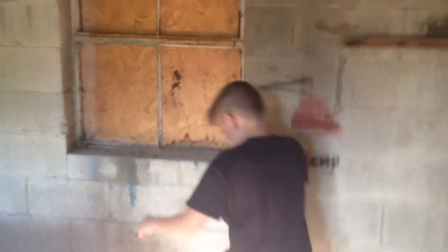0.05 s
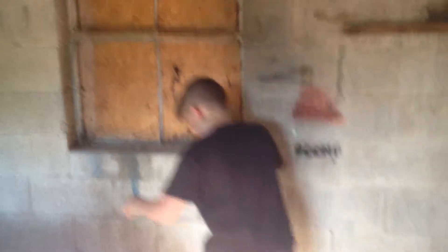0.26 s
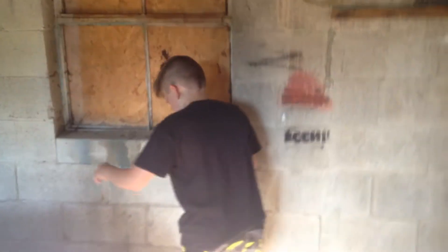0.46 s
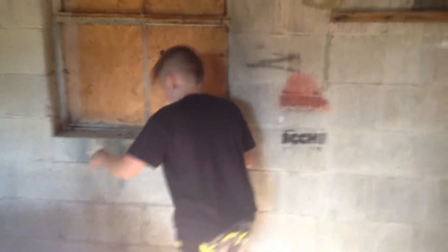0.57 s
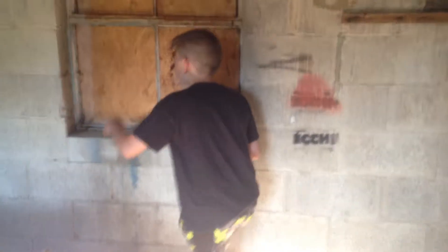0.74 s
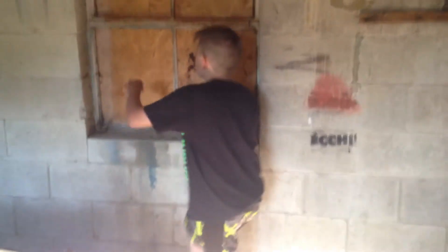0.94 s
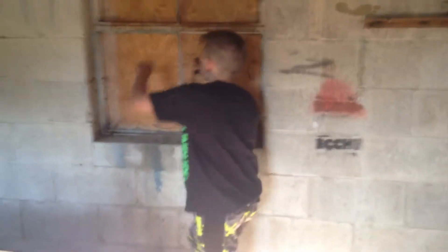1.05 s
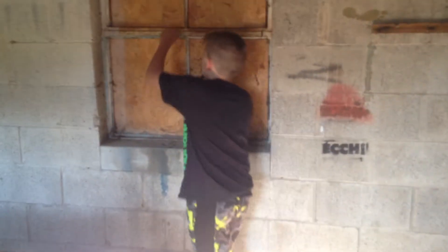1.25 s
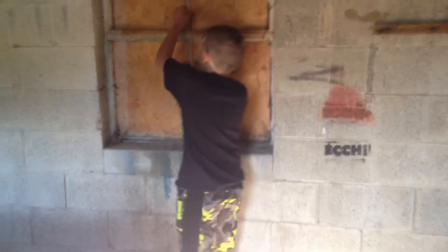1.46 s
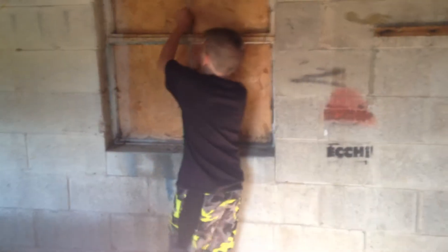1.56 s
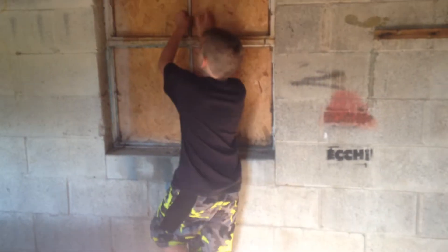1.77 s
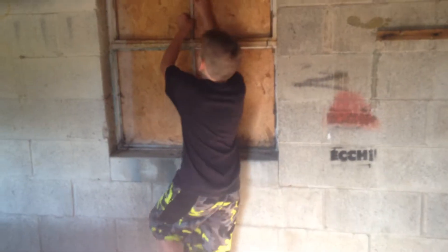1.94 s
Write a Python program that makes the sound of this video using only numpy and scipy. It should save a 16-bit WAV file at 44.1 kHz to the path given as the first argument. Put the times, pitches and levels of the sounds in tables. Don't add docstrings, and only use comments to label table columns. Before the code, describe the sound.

A wooden board is knocked in a window frame inside an empty block room. Faint scuffs and a soft thud begin, with a sharp gritty snap near 0.35 s, then near quiet. At 1.05-1.27 s come the loudest hollow knocks, low thumps and scrapes. Lighter taps and scuffs follow at 1.35-1.5 s. Short bare-wall echoes, distant raspy bird chirps, a very faint insect pulse, traffic hum and thin hiss continue behind.

```python
import sys
import numpy as np
from scipy import signal
from scipy.fft import rfft, irfft, next_fast_len
from scipy.io import wavfile
from scipy.ndimage import map_coordinates

SR = 44100
rng = np.random.default_rng(int(sys.argv[2]) if len(sys.argv) > 2 else 0)


def to_wav(sig):
    pcm = np.clip(np.atleast_2d(sig), -1, 1) * 32767
    pcm = np.round(pcm).astype(np.int16)
    wavfile.write(sys.argv[1], SR, pcm.T)


def gain_from_decibels(decibels):
    exponent = np.asarray(decibels, float) / 20
    return 10 ** exponent


N = 88244

# time_s, level_db
TRAFFIC_LEVEL = [
    (0.0, -55),
    (0.3, -62.5),
    (0.93, -62),
    (1.16, -57.5),
    (1.51, -60.5),
    (2.0, -58),
]
# frequency_hz, density_db (per Hz)
HUM_SPECTRUM = [(12, -80), (20, -49), (46, -9.5), (75, 1.5), (144, -6), (211, -17.5), (262, -35.5),
                (300, -22), (390, -41), (660, -120)]
# frequency_hz, density_db
AIR_SPECTRUM = [(120, -82), (200, -3), (500, -1), (800, -6), (1400, -7), (2600, -13), (7500, -19),
                (15300, -28.5)]
# start_s, length_s, from_hz, to_hz, level_db
CHIRPS = [(0.0, 0.0079, 5605, 5800, -50), (0.06, 0.042, 5840, 4800, -54.5), (0.17, 0.023, 3970, 5000, -56),
          (0.195, 0.025, 5134, 5900, -49.5), (0.75, 0.034, 3660, 4200, -59.5),
          (0.785, 0.036, 5750, 4200, -50.5), (0.85, 0.03, 6020, 5500, -50),
          (0.875, 0.015, 3650, 3400, -53.5), (0.92, 0.03, 5240, 3500, -55), (0.955, 0.039, 5490, 5800, -59),
          (1.423, 0.022, 5100, 5320, -66), (1.465, 0.038, 4355, 5400, -59.5),
          (1.58, 0.031, 3870, 5040, -59), (1.605, 0.0396, 5323, 5620, -50), (1.72, 0.038, 5170, 5600, -63)]
# start_s, level_db,
# centre_hz, width_hz
SNAPS = [(0.005, -57, 2380, 4000), (0.253, -37.5, 2230, 2500), (0.306, -50, 10300, 9000),
         (0.337, -46, 6330, 7000), (0.354, -27, 3800, 2880), (0.3542, -30, 10200, 12300),
         (0.3551, -32, 2490, 4060), (0.362, -34, 1110, 1480), (0.362, -43.5, 8900, 9700),
         (0.59, -62, 8000, 7800), (1.008, -41, 8100, 2460), (1.0107, -45, 8350, 2500),
         (1.0095, -49, 11500, 6030), (1.008, -49.5, 2800, 1490), (1.058, -37, 2060, 1900),
         (1.086, -32.5, 2960, 1930), (1.086, -45, 8500, 4000), (1.177, -42, 4200, 5000),
         (1.356, -39, 2400, 3460), (1.356, -46, 6950, 2930), (1.471, -42, 3400, 4000),
         (1.637, -61, 2630, 2680)]
# start_s, length_s, level_db, tilt_db_per_octave, frame_resonance_hz
DRAGS = [(0.0, 0.0068, -44.5, 0, 2500), (0.034, 0.07, -58, 1, 1480), (0.084, 0.089, -54, -0.5, 830),
         (0.183, 0.12, -63, 2.5, 1460), (0.353, 0.019, -46.5, 1, 1220), (0.742, 0.22, -66.5, 2, 980),
         (1.058, 0.031, -40, -6, 1410), (1.083, 0.077, -41.5, -2.5, 2550), (1.169, 0.054, -41, -0.5, 2200),
         (1.352, 0.051, -49.5, -1.5, 1940), (1.419, 0.084, -58, -0.5, 1520), (1.54, 0.064, -65.5, 2, 800)]
# frequency_hz, level_db
GRIT_SPECTRUM = [(60, -10), (150, -10.5), (300, -4), (700, -1), (1300, -7), (3200, -10.5), (7000, -17),
                 (15300, -35.5)]
# start_s, level_db, top_hz (a soft blow has a low top frequency)
KNOCKS = [(0.002, -48, 2530), (0.083, -35, 95), (0.1, -48, 1220), (0.356, -46, 1496), (1.058, -28, 1660),
          (1.069, -23, 1020), (1.088, -30, 1790), (1.106, -44, 1800), (1.1, -23, 170), (1.15, -19, 95),
          (1.155, -32, 900), (1.2, -38.5, 1490), (1.256, -32.5, 204), (1.358, -41.5, 1520),
          (1.435, -46.5, 1500), (1.471, -47.5, 1820)]
# frequency_hz, level_db, t60_s
BOARD_MODES = [(81.2, -3.5, 0.12), (158.6, 0, 0.13), (208, -4, 0.056), (257.4, -5, 0.083),
               (356.6, -3, 0.076), (439.5, -3.5, 0.079), (510, 2.5, 0.038), (672, 2.5, 0.065),
               (772.4, 3.5, 0.069), (1056, 4, 0.032), (1365, -8.5, 0.09), (1755, 2, 0.042),
               (2146, 1.5, 0.036), (2670, -12, 0.016)]
# frequency_hz, t60_s
ROOM_T60 = [(100, 0.63), (500, .45), (1400, 0.53), (3700, 0.37), (5500, 0.47), (7500, 0.35), (12000, 0.37)]


def unit(x):
    return x / np.sqrt(np.mean(x ** 2) + 1e-20)


def along(points, hz):
    f, v = np.transpose(points)
    return np.interp(np.log(hz + 1), np.log(f + 1), v)


def wobble(rate_hz):
    knots = rng.standard_normal(int(N * rate_hz / SR) + 4)
    return map_coordinates(knots, [np.arange(N) * rate_hz / SR])


def filtered(x, response):
    size = next_fast_len(len(x) + 8192)
    hz = np.fft.rfftfreq(size, 1 / SR)
    return irfft(rfft(x, size) * response(hz), size)[:len(x)]


def add(track, start_s, x):
    part = track[max(round(start_s * SR), 0):][:len(x)]
    part += x[:len(part)]


def traffic_hum(noise):
    t = np.arange(N) / SR
    unsteady = gain_from_decibels(0.83 * wobble(14.37))
    hum = unit(unsteady * filtered(noise, lambda f: gain_from_decibels(along(HUM_SPECTRUM, f))))
    hum_gain_db = 3.5
    return gain_from_decibels(hum_gain_db + np.interp(t, *np.transpose(TRAFFIC_LEVEL))) * hum


def air_hiss(noise):
    hiss = unit(filtered(noise, lambda f: gain_from_decibels(along(AIR_SPECTRUM, f))))
    level_db = -69.5
    return gain_from_decibels(level_db) * gain_from_decibels(wobble(1.9)) * hiss


def insect(noise):
    t = np.arange(N) / SR
    centre_hz, width_hz, pulse_hz, peak_s, level_db = 7500, 250, 13.6, 1.75, -82
    song = unit(filtered(noise, lambda f: np.exp(-((f - centre_hz) / width_hz) ** 2)))
    pulses = np.exp(0.38 * (np.cos(2 * np.pi * pulse_hz * (t - peak_s)) - 1))
    return gain_from_decibels(level_db) * pulses * song


def birds():
    out = np.zeros(N)
    rasp = wobble(700)
    warble_hz, warble_depth, rasp_depth = 90, 0.02, 0.042
    for start_s, length_s, from_hz, to_hz, level_db in CHIRPS:
        u = np.linspace(0, 1, int(length_s * SR))
        glide_hz = from_hz + (to_hz - from_hz) * u
        warble = warble_depth * np.sin(2 * np.pi * warble_hz * length_s * u)
        scatter = rasp_depth * rasp[round(start_s * SR):][:len(u)]
        phase = 2 * np.pi * np.cumsum(glide_hz * (1 + warble + scatter)) / SR
        add(out, start_s, gain_from_decibels(level_db + 3) * np.sin(np.pi * u) * np.sin(phase))
    return out


def snaps():
    out = np.zeros(N)
    impulse = np.arange(512) == 0
    for start_s, level_db, centre_hz, width_hz in SNAPS:
        def resonance(f):
            damping = 1j * f * width_hz
            return (damping / (centre_hz ** 2 - f * f + damping)) ** 3

        crack = filtered(impulse, resonance)
        add(out, start_s, gain_from_decibels(level_db) * crack / np.abs(crack).max())
    return out


def drags():
    out = np.zeros(N)
    t = np.arange(N) / SR
    grains_per_s, grain_db, uneven_db = 3000, 3, 2
    rise_s, fall_s = 0.005, 0.022
    frame_db, frame_octaves = 3.5, 0.84
    for start_s, length_s, level_db, tilt_db, frame_hz in DRAGS:
        hit = rng.random(N) < grains_per_s / SR
        size = gain_from_decibels(grain_db * np.minimum(rng.exponential(size=N), 3))
        noise = rng.standard_normal(N)
        grains = hit * size * np.sign(noise) + 0.38 * noise

        def colour(f):
            tilt = tilt_db * np.log2((f + 50) / 1000)
            octaves = np.log2((f + 1) / frame_hz)
            frame = frame_db * np.exp(-(octaves / frame_octaves) ** 2)
            return gain_from_decibels(along(GRIT_SPECTRUM, f) + tilt + frame)

        rub = unit(filtered(grains, colour))
        rise = np.clip((t - start_s) / rise_s, 0, 1)
        fall = np.exp(-np.clip(t - start_s - length_s, 0, None) / fall_s)
        out += gain_from_decibels(level_db + uneven_db * wobble(45)) * rise * fall * rub
    return out


def board():
    out = np.zeros(N)
    t = np.arange(SR // 3) / SR
    mode_hz, mode_db, t60_s = np.transpose(BOARD_MODES)[:, :, None]
    contact_cycles = 2.67
    for start_s, level_db, top_hz in KNOCKS:
        scatter_db = rng.normal(0, 1.5, mode_hz.shape)
        gain = gain_from_decibels(mode_db + scatter_db) / (1 + (mode_hz / top_hz) ** 2)
        pitch_hz = mode_hz * rng.normal(1, 0.0098, mode_hz.shape)
        cycles = pitch_hz * t + rng.random(mode_hz.shape)
        ring = gain * gain_from_decibels(-60 * t / t60_s) * np.sin(2 * np.pi * cycles)
        build_up = 1 - np.exp(-t * top_hz / contact_cycles)
        add(out, start_s, gain_from_decibels(level_db - 7) * build_up * ring.sum(axis=0))
    return out


def room(x):
    out = np.zeros(N)
    size = SR // 4
    gap_s = 0.004
    for i in range(0, N, size):
        hz, t, z = signal.stft(rng.standard_normal(SR), SR, nperseg=256)
        decay = gain_from_decibels(-60 * t / along(ROOM_T60, hz)[:, None])
        tail = signal.istft(z * decay, SR, nperseg=256)[1]
        tail = tail / np.linalg.norm(tail)
        add(out, i / SR + gap_s, signal.fftconvolve(x[i:i + size], tail))
    return out


def scene():
    body, rub, crack, far = board(), drags(), snaps(), birds()
    wet = room(gain_from_decibels(-1.5) * body + gain_from_decibels(-6) * rub + gain_from_decibels(-4) * crack + far)
    direct = body + rub + crack + gain_from_decibels(-14) * far
    noise = rng.standard_normal((3, N))
    background = traffic_hum(noise[0]) + air_hiss(noise[1]) + insect(noise[2])
    return (direct + wet + background)[None]


def band_limit(x):
    return signal.sosfilt(signal.butter(12, 16450, fs=SR, output="sos"), x)


def record(dry):
    top_hz, bass_cut_hz = 15900, 22.3

    def microphone(f):
        return (f < top_hz) * (1j * f / (bass_cut_hz + 1j * f)) ** 3

    return band_limit(filtered(dry[0], microphone)[None])


dry = scene()
out = record(dry)
to_wav(out)
```